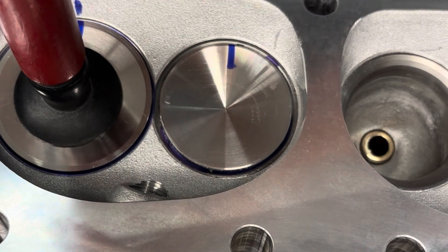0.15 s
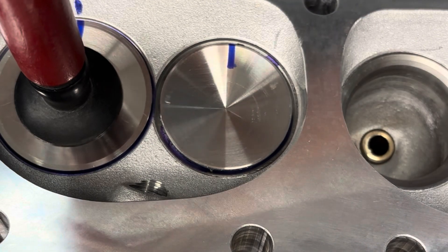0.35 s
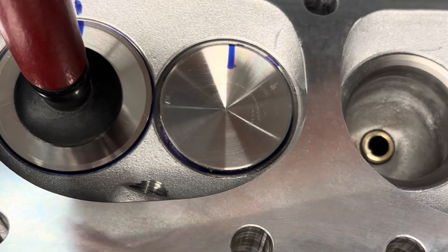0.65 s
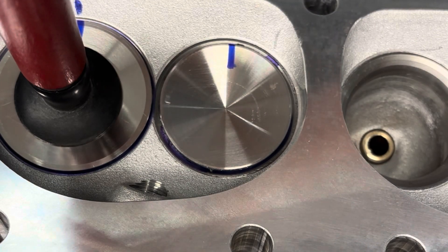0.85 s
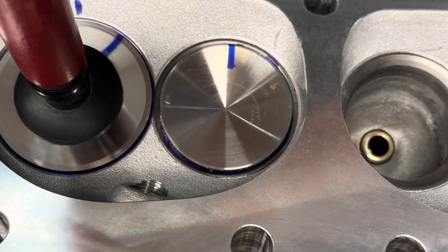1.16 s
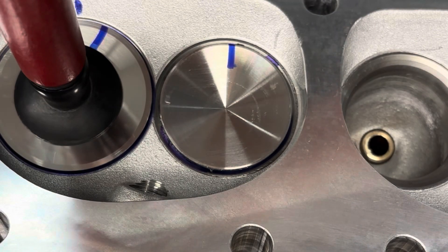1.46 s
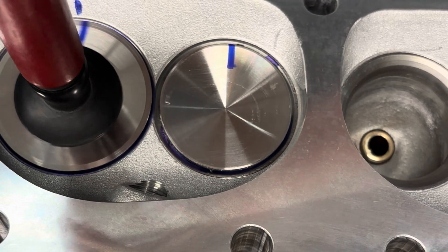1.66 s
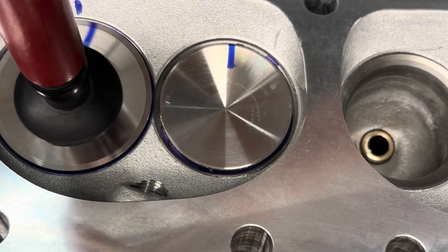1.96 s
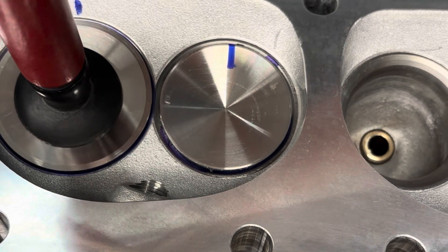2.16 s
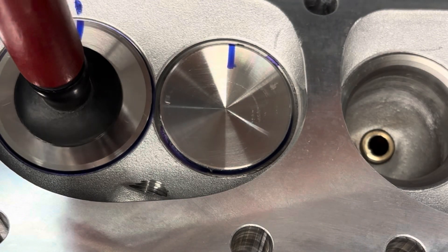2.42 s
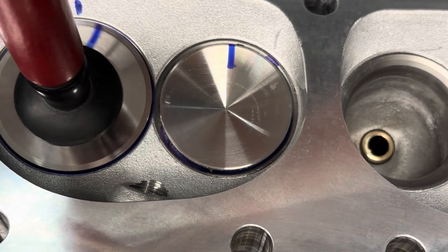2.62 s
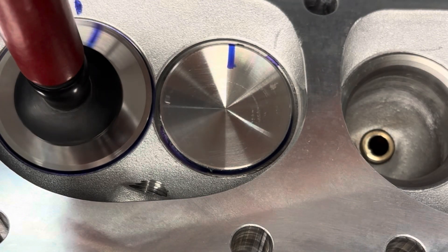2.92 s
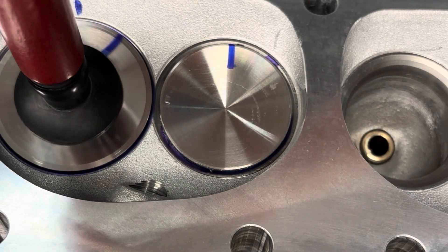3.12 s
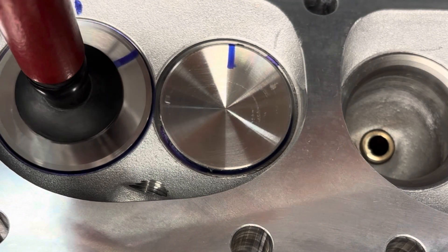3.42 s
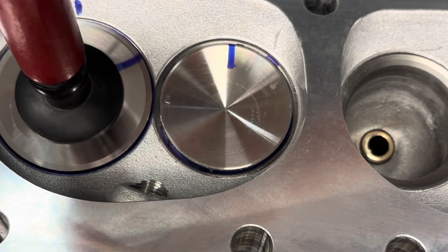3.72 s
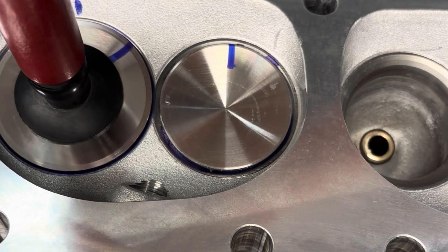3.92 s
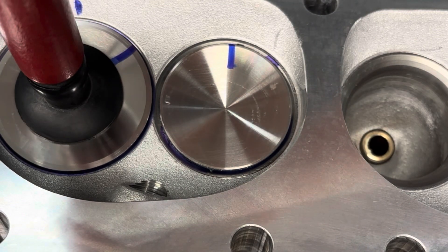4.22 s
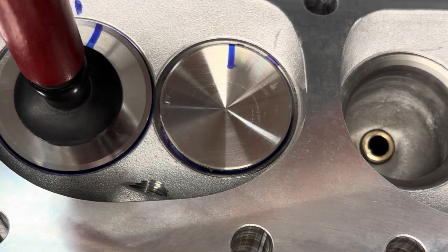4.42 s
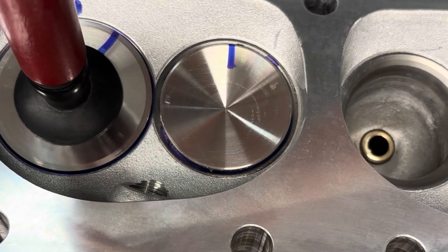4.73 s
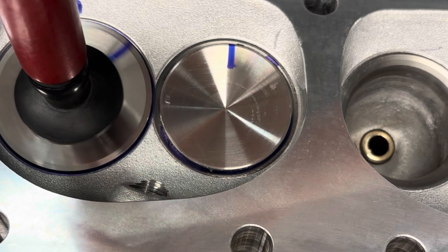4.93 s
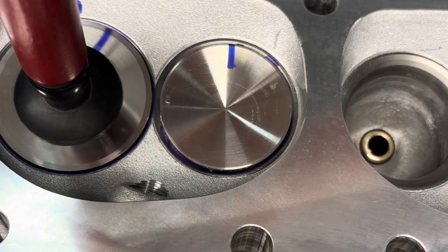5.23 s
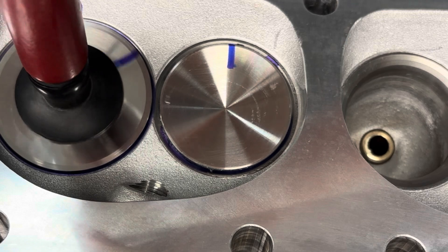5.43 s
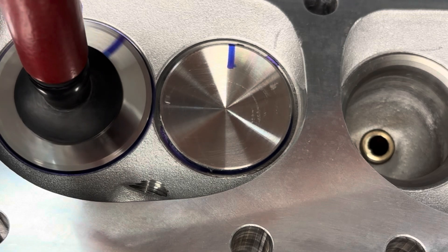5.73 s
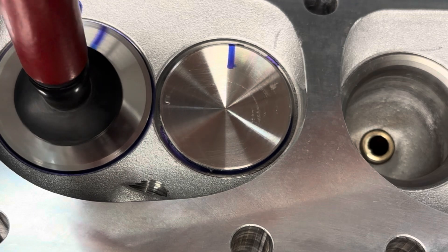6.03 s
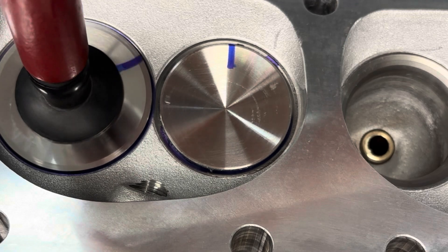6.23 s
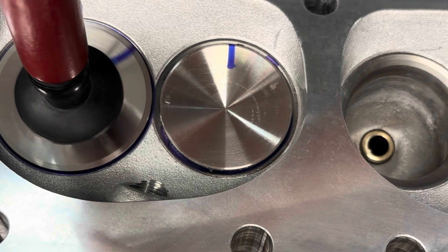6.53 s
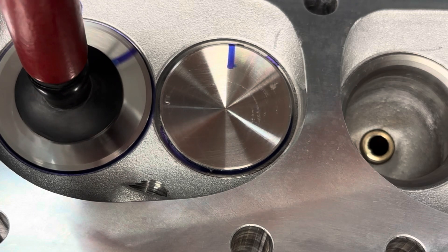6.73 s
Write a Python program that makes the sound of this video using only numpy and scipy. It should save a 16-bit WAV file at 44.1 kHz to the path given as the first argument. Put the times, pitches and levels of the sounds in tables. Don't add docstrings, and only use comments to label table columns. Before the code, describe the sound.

Gritty metallic rubs, about seven a second, grind to and fro on a ringing metal casting over a low fan hum, with one short break.

```python
import sys
import numpy as np
from scipy import signal
from scipy.fft import rfft, irfft, next_fast_len
from scipy.io import wavfile
from scipy.ndimage import uniform_filter1d, map_coordinates

SR = 44100
rng = np.random.default_rng(int(sys.argv[2]) if len(sys.argv) > 2 else 0)


def master_out(mix):
    frames = np.transpose(np.atleast_2d(mix))
    ceiling = np.clip(frames, -1, 1)
    pcm = np.round(ceiling * 32767).astype(np.int16)
    wavfile.write(sys.argv[1], SR, pcm)


def makeup_ratio(level_db):
    decades = np.asarray(level_db, float) / 20
    return 10 ** decades


N = 302967


def unit(x):
    return x / np.sqrt(np.mean(x ** 2) + 1e-20)


def along(points, hz):
    f, v = np.transpose(points)
    return np.interp(np.log(hz + 1), np.log(f + 1), v)


def wobble(rate_hz):
    knots = rng.standard_normal(int(N * rate_hz / SR) + 4)
    return map_coordinates(knots, [np.arange(N) * rate_hz / SR])


def filtered(x, response):
    m = 2 * next_fast_len(N // 2 + SR // 4)
    return irfft(rfft(x, m) * response(np.fft.rfftfreq(m, 1 / SR)), m)[..., :N]


def patchy(x, depth_db, bins, frames):
    z = signal.stft(x, nperseg=512)[2]
    field = rng.standard_normal(z.shape[-2:])
    field = uniform_filter1d(field, bins, axis=0)
    field = uniform_filter1d(field, frames, axis=1)
    return signal.istft(z * makeup_ratio(depth_db * unit(field)), nperseg=512)[1][..., :N]


# pitch_hz, level_db (per Hz)
FAN_RUMBLE = [(25, -32), (40, -25.5), (58, -7.5), (71, 0.5), (85, -4), (100, -6.5), (119, -2.5), (140, -8),
              (170, -19), (210, -27), (320, -39), (500, -73)]
# pitch_hz, side_minus_mid_db
FAN_SPREAD = [(25, -22), (60, -16), (130, -15), (300, -5)]
# pitch_hz, level_db
MOTOR_TONES = [(258.4, -65.5)]


def fan():
    t = np.arange(N) / SR
    level_db, sway_db, louder_left_db = -39.5, 1.42, 0.7
    noise = rng.standard_normal((2, N))
    mid = filtered(noise[0], lambda hz: makeup_ratio(along(FAN_RUMBLE, hz)))
    side = filtered(noise[1], lambda hz: makeup_ratio(along(FAN_RUMBLE, hz) + along(FAN_SPREAD, hz)))
    rumble = unit(np.array([(mid + side) * makeup_ratio(louder_left_db), mid - side]))
    out = makeup_ratio(level_db + sway_db * wobble(2.9)) * rumble
    for hz, db in MOTOR_TONES:
        loudness = makeup_ratio(db + 2.5 + 2.2 * wobble(12))
        out += loudness * np.sin(2 * np.pi * hz * t + 0.44 * wobble(3.97))
    return out


# pitch_hz, level_db (per Hz)
HISS_COLOUR = [(200, -20), (310, -4), (450, -17), (4300, -23), (6000, -31), (6900, -60), (8500, -60),
               (9300, -33), (11500, -29), (14000, -35), (15800, -50)]
# pitch_hz, level_db (per Hz)
HISS_SPREAD = [(200, -1.5), (310, -6), (510, -15), (2900, -23), (8000, -30.5), (10500, -38), (11500, -55),
               (14000, -52), (15000, -44)]
# time_s, level_db
HISS_LEVEL = [(0, -73.5), (.1, -68.5), (4, -68.5), (6.87, -76)]
# start_s, pitch_hz, level_db
CLINKS = [
    (.435, 1300, -71),
    (.505, 1250, -66),
    (.075, 1000, -74),
]


def air():
    noise = patchy(rng.standard_normal((2, N)), 1.8, bins=30, frames=20)
    hiss_db = np.interp(np.arange(N) / SR, *np.transpose(HISS_LEVEL))
    mid = makeup_ratio(hiss_db) * unit(filtered(noise[0], lambda hz: makeup_ratio(along(HISS_COLOUR, hz))))
    side = makeup_ratio(-64.0) * unit(filtered(noise[1], lambda hz: makeup_ratio(along(HISS_SPREAD, hz))))
    t = np.arange(SR // 20) / SR
    for s, hz, db in CLINKS:
        side[round(s * SR):][:len(t)] += makeup_ratio(db - 60 * t / 0.06) * np.sin(2 * np.pi * hz * t)
    return np.array([mid + side, mid - side])


# start_s, length_s, rub_db
FIRST_TURNS = [(0.986, 0.1, -39), (1.127, 0.14, -36.5), (1.327, 0.1, -39), (1.479, 0.09, -37.5),
               (1.619, 0.098, -36.5), (1.771, 0.1, -38.5), (1.914, 0.088, -37.5), (2.039, 0.082, -36.5),
               (2.171, 0.079, -36.5), (2.322, 0.07, -39.5), (2.446, 0.082, -34.5), (2.581, 0.095, -36.5),
               (2.735, 0.087, -33), (2.881, 0.098, -32.5), (3.039, 0.099, -33), (3.179, 0.087, -37.5),
               (3.315, 0.091, -32.5), (3.456, 0.093, -36), (3.597, 0.088, -33), (3.729, 0.085, -33.5),
               (3.853, 0.07, -35)]
# start_s, length_s, rub_db
LATER_TURNS = [(4.308, 0.082, -35.5), (4.436, 0.11, -34.5), (4.592, 0.087, -35.5), (4.762, 0.092, -35.5),
               (4.892, 0.1, -31.5), (5.034, 0.091, -32), (5.16, 0.089, -36), (5.294, 0.086, -34.5),
               (5.423, 0.099, -33), (5.57, 0.089, -32.5), (5.699, 0.084, -34.5), (5.829, 0.083, -33),
               (5.96, 0.1, -32.6), (6.104, 0.093, -32), (6.239, 0.096, -32), (6.381, 0.089, -31.5),
               (6.51, 0.096, -33), (6.654, 0.092, -33), (6.792, 0.095, -32.5)]
# start_s, length_s, rub_db
SMALL_SLIPS = [
    (0.345, 0.01, -69.5),
    (3.971, 0.0138, -57),
    (3.988, 0.037, -52),
    (4.12, 0.0074, -79),
    (4.162, .008, -71),
    (4.174, 0.052, -49),
    (4.25, 0.015, -66),
    (4.295, .012, -63),
]


def strokes(dome_db, rise, fall):
    usual_s = 0.088
    knee_db, head_full_db = 4.5, -40
    gains = np.zeros((3, N))
    for s, length, db in FIRST_TURNS + LATER_TURNS + SMALL_SLIPS:
        longer_s = length - usual_s
        fastest = max(0.49 + 4.6 * longer_s, 0.17)
        head_db = -knee_db * np.logaddexp(-(db + 2.5) / knee_db, -head_full_db / knee_db)
        head_db += -4 * np.exp(-abs(s - FIRST_TURNS[0][0]) / 0.44)
        sizzle_db = db - 4 + np.clip(63 * longer_s, -1.2, 1.2) + 5 * (db < head_full_db - 5)
        first = max(round((s - 0.03) * SR), 0)
        last = min(round((s + length + 0.06) * SR), N)
        t = np.arange(first, last) / SR - s
        edge = np.minimum(length / 0.11, 1)
        dome = -dome_db * np.clip(2 * (t / length - fastest), -1.2, 1.2) ** 2
        bite = -np.logaddexp(0, rise / edge * (0.005 * edge - t))
        release = -3 * np.logaddexp(0, fall / edge * (t - length + 0.0045 * edge) / 3)
        shape = dome * np.array([[1], [0.5], [1.1]]) + bite + release * np.array([[1], [0.8], [1.15]])
        gains[:, first:first + len(t)] += makeup_ratio(np.array([[db], [head_db], [sizzle_db]]) + shape)
    return gains


def grit(spiky, clump_db):
    clumps_db = clump_db * (0.46 * wobble(40) + wobble(330))
    size = makeup_ratio(spiky * rng.exponential(1, (2, N)) + clumps_db)
    return unit(patchy(size * rng.standard_normal((2, N)), 1.2, bins=3, frames=6))


def body(modes):
    def response(f):
        power = sum(makeup_ratio(2 * db) * (f * w) ** 2 / ((c * c - f * f) ** 2 + (f * w) ** 2) for c, w, db in modes)
        cepstrum = irfft(np.log(power / power.mean() + 1e-12) / 2)
        cepstrum[1:len(f) - 1] *= 2
        cepstrum[len(f):] = 0
        return np.exp(rfft(cepstrum))
    return response


# pitch_hz, width_hz, level_db
DISC_RINGS = [(1842, 216, -14.5), (2703, 31, -14), (3410, 70, -17), (3864, 135, -5.5), (3978, 51, -2),
              (4015, 24, -0.5), (4225, 102, -5), (4484, 460, -13), (5840, 590, -18), (6540, 180, -18),
              (7650, 680, -21), (8110, 580, -16.5), (2580, 1100, -45)]
# pitch_hz, width_hz, level_db
RIM_RINGS = [(9070, 200, -7), (9440, 170, -3), (9950, 600, -11), (10330, 200, -8), (10485, 100, 1),
             (11150, 400, -10), (11900, 900, -15), (13050, 350, -19), (15450, 350, -22)]
# pitch_hz, width_hz, level_db
HEAD_RINGS = [(395.5, 37, -11), (520, 17, -3), (556, 26, -6.5), (679, 74, -3), (870, 67, -3),
              (975, 15, -3.5), (1043, 21, -0.5), (1184, 27, 4.5), (1228.3, 19.7, 3), (1270, 9.5, -2),
              (1346, 11, 1), (990, 1370, -10)]


def lapping():
    rub, head, sizzle = strokes(dome_db=7.5, rise=1430, fall=664)
    scratch = grit(spiky=1, clump_db=1.5)
    disc = makeup_ratio(-1) * filtered(rub * scratch, body(DISC_RINGS))
    rim = makeup_ratio(-0.5) * filtered(sizzle * scratch, body(RIM_RINGS))
    seat = filtered(head * grit(spiky=0.25, clump_db=0.66), body(HEAD_RINGS))
    return disc + rim + seat


# start_s, level_db, pitch_factor
BUMPS = [
    (1.145, -35, 1.005),
    (4.175, -39, 1.5),
    (4.25, -51, 1.45),
    (3.9, -39.5, 1.6),
]
# start_s, length_s, from_hz, to_hz, level_db
CUP_SQUEAKS = [
    (1.0, 0.12, 809, 1270, -48),
    (1.34, 0.1, 870, 1036, -63),
    (1.483, 0.099, 1058, 1243, -48),
]


def stick():
    out = np.zeros(N)
    t = np.arange(SR // 5) / SR
    rough = wobble(110)
    for s, db, pitch in BUMPS:
        ring = sum(np.sin(2 * np.pi * pitch * hz * t) for hz in (265, 300, 345))
        out[round(s * SR):][:len(t)] += makeup_ratio(db - 60 * t / 0.058) * (1 - np.exp(-t / 0.0044)) * ring
    for s, length, from_hz, to_hz, db in CUP_SQUEAKS:
        u = np.clip(t / length, 0, 1)
        shake = rough[round(s * SR):][:len(t)]
        turns = np.cumsum(from_hz + (to_hz - from_hz) * u + 45 * shake[::-1]) / SR
        loudness = makeup_ratio(db + 3.1 * shake) * np.sin(np.pi * u) ** 0.5
        out[round(s * SR):][:len(t)] += loudness * np.sin(2 * np.pi * turns)
    return out


# pitch_hz, width_hz, level_db
DIPS_AND_LIFTS = [(744, 26, -4.5), (1031, 19, -3.5), (1211, 13.4, 3.5), (3724, 107, -12), (4095, 65, 2.5),
                  (13470, 2800, -5)]


def dips_and_lifts(f):
    return np.prod([(c * c - f * f + 1j * f * w * makeup_ratio(db)) / (c * c - f * f + 1j * f * w)
                    for c, w, db in DIPS_AND_LIFTS], axis=0)


# pitch_hz, likeness (0 to 1)
PORT_LIKENESS = [(400, .85), (900, .9), (1500, .3), (2100, .6), (3000, .9), (4100, .93), (5200, .4),
                 (6500, .8), (7100, 1), (8200, 1), (8700, .7), (10000, .8), (11300, 1), (14000, 1),
                 (15300, .4)]
# pitch_hz, lead_radians
LEFT_LEAD = [(900, .2), (1300, 2), (1800, .6), (2900, .25), (3400, 0), (4000, -.5), (5000, -1.3),
             (5400, -3.9), (7000, -3.14), (8300, -3.14), (10000, -1.1), (11300, -.05), (14600, 0),
             (15300, 2.5)]
# pitch_hz, left_minus_right_db
LEFT_LEAN = [(700, 0), (1200, 4), (1700, -1), (2700, -5), (3100, 0), (5200, 1), (5700, -3.5), (6800, 0)]


def ports(pair):
    half = np.array([[0.5], [-0.5]])

    def share(hz):
        angle = np.arccos(np.clip(along(PORT_LIKENESS, hz), 0, 1)) / 2
        return np.array([np.cos(angle), np.sin(angle)])

    def placing(hz):
        lead = np.exp(1j * half * along(LEFT_LEAD, hz))
        return dips_and_lifts(hz) * lead * makeup_ratio(half * along(LEFT_LEAN, hz))

    same, other = filtered(pair, share)
    return filtered(same + 2 * half * other, placing)


# pitch_hz, fade_s
SHOP_FADE = [(300, 0.51), (1500, 0.13), (4000, 0.12), (12000, 0.15)]


def shop(x):
    hz, t, z = signal.stft(rng.standard_normal((2, SR // 3)), SR, nperseg=256)
    fade = makeup_ratio(-60 * t / along(SHOP_FADE, hz)[:, None])
    tail = signal.istft(z * fade, SR, nperseg=256)[1]
    late = np.pad(x, (200, 0))[None]
    return signal.fftconvolve(late, tail / np.linalg.norm(tail[0]), axes=1)[:, :N]


def scene():
    near = lapping() + stick()
    return makeup_ratio(1.0) * ports(near) + makeup_ratio(-15.5) * shop(near[0]) + fan() + air()


def roll_off(x):
    return signal.sosfilt(signal.butter(12, 15800, fs=SR, output="sos"), x)


def record(dry):
    return roll_off(dry)


dry = scene()
out = record(dry)
master_out(out)
```